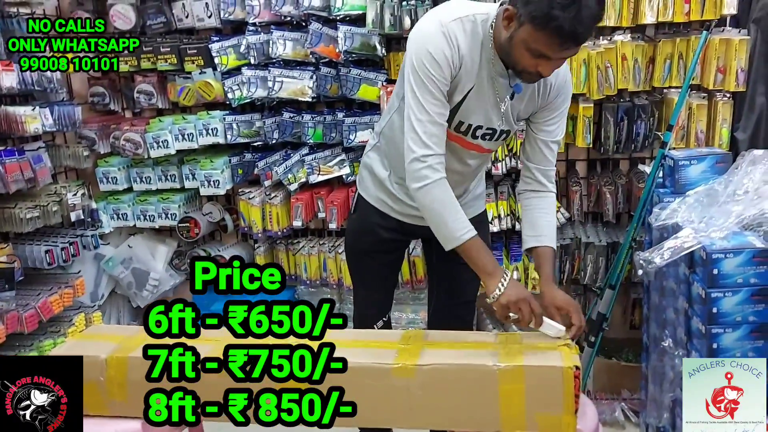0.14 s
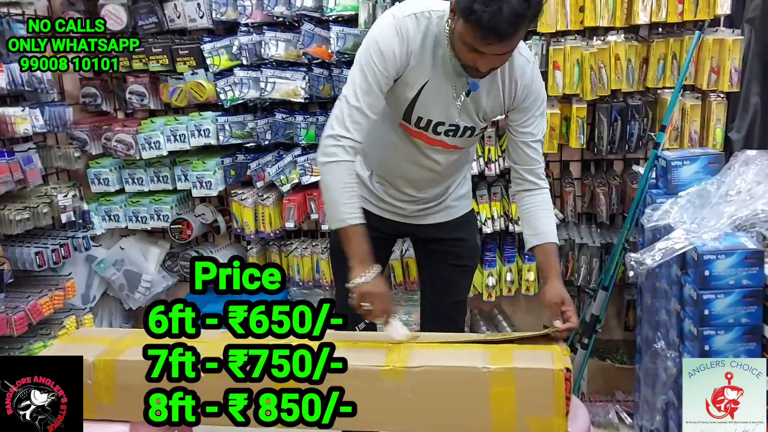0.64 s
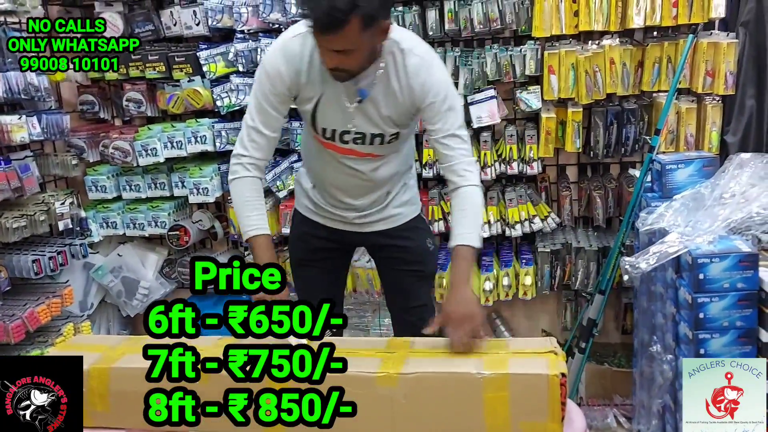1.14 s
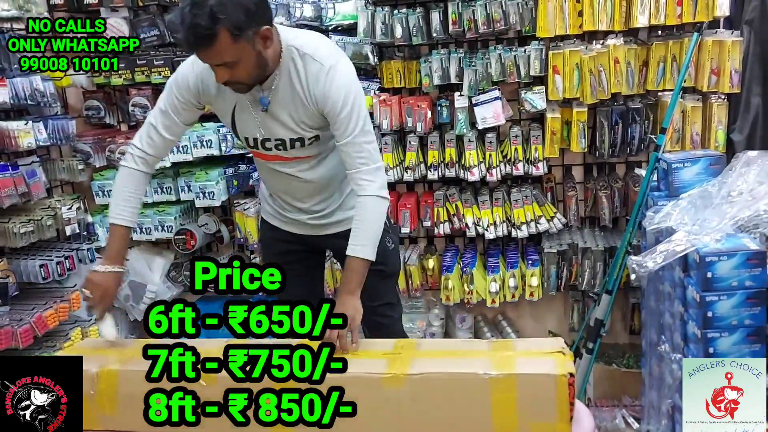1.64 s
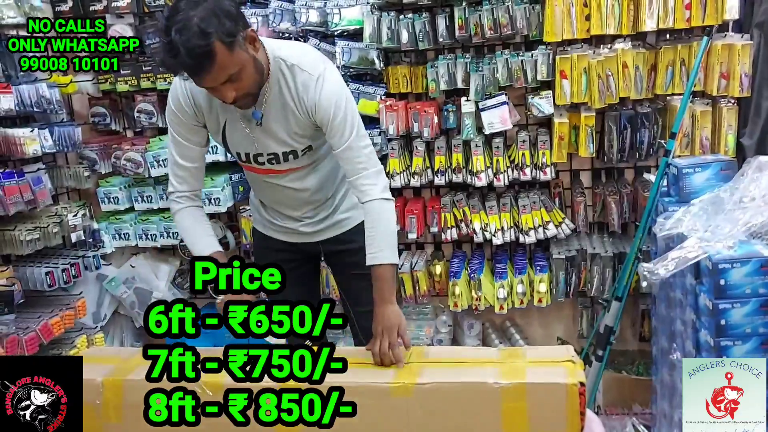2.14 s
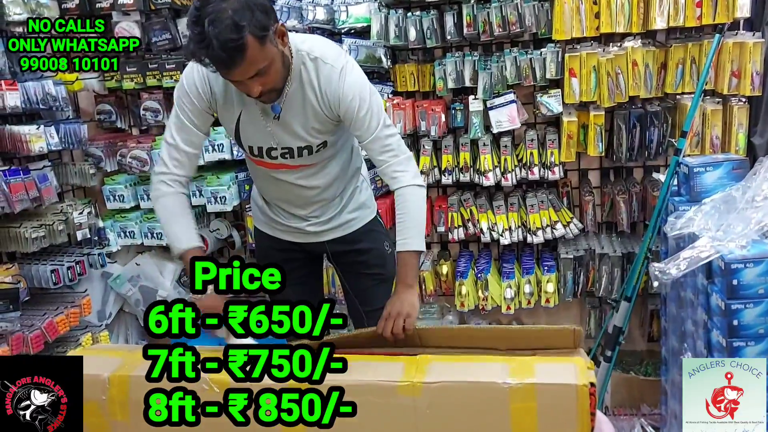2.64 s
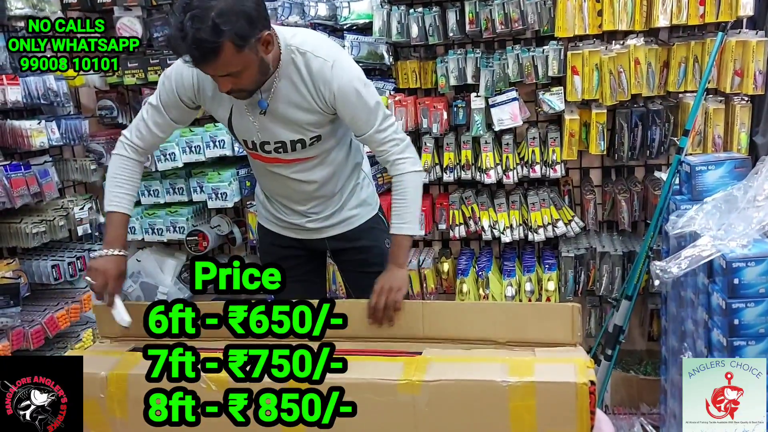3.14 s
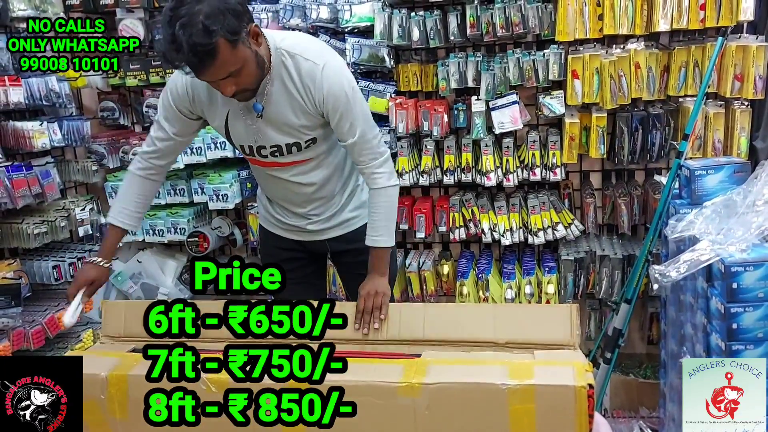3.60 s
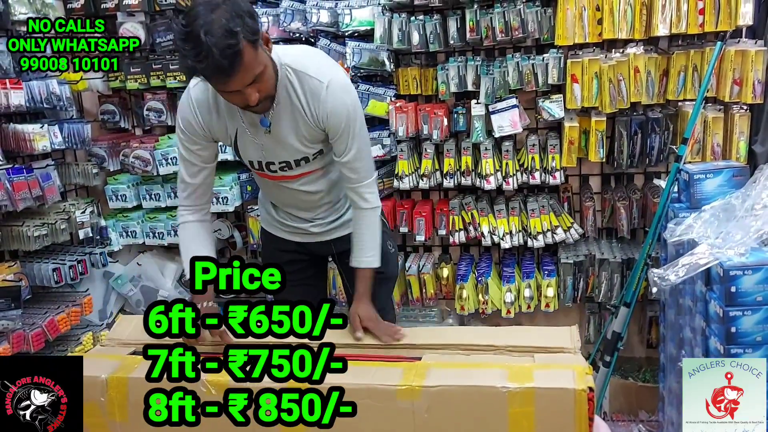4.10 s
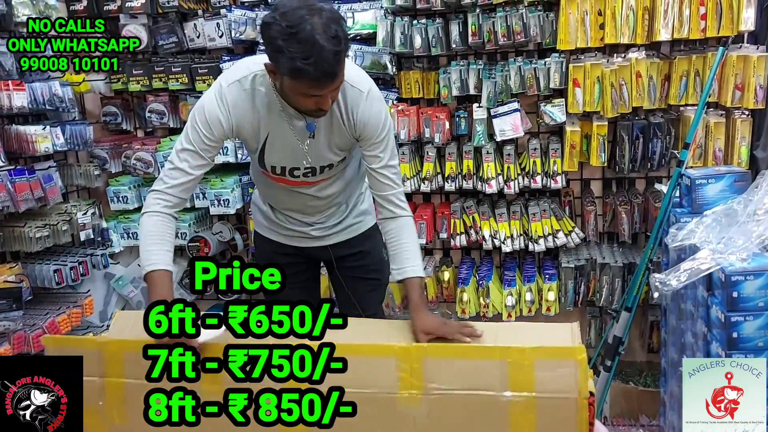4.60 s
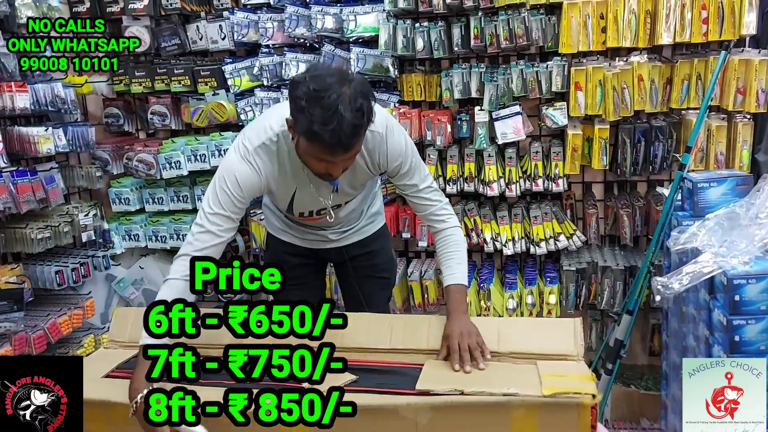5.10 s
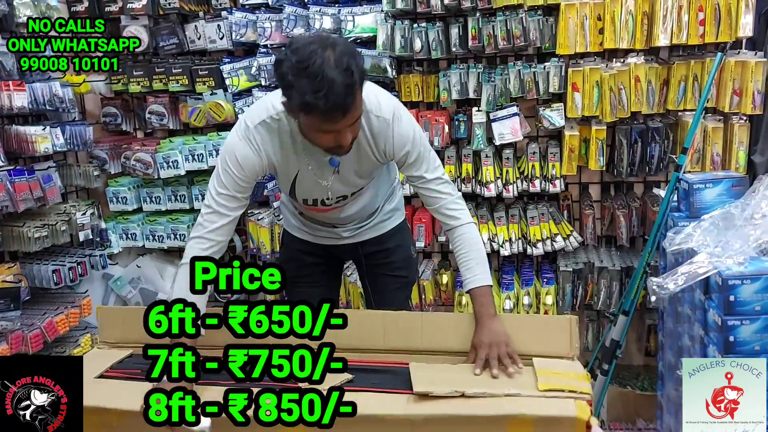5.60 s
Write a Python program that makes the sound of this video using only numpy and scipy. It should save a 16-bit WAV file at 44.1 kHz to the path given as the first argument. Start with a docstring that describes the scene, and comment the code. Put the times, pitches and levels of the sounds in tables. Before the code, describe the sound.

Crackling tape tears on a long hollow carton, with a rising ribbed buzz, two loud pops, sliding hands and tiny metallic clinks.

```python
"""A small shop, heard by a stereo microphone: street rumble through the door, soft air noise, a faint held tone.
Hands lie on a long cardboard box; from 0.3 s a cutter scrapes and tears its taped seam in dense clicks.
The hollow box, a set of ringing modes, booms with slips and blows, and the metal links of a bracelet clink.
Near 1.5 s the blade buzzes across the ribs of the board, faster and faster; near 2.8 and 3 s flaps pop free.
Then mostly hands slide over the flaps, with more knocks, a last clink and a last pull at the seam."""
import sys
import numpy as np
from scipy import signal
from scipy.fft import rfft, irfft, next_fast_len
from scipy.io import wavfile
from scipy.ndimage import uniform_filter1d

SR = 44100
rng = np.random.default_rng(int(sys.argv[2]) if len(sys.argv) > 2 else 0)


def ratio(d):
    """dB to gain"""
    e = np.asarray(d, float) / 20
    return 10 ** e


def master_out(mix):
    """Clip the mix to full scale and print it as 16-bit PCM to the path in sys.argv[1]."""
    frames = np.transpose(np.atleast_2d(mix))
    ceiling = np.clip(frames, -1, 1)
    pcm = np.round(ceiling * 32767).astype(np.int16)
    wavfile.write(sys.argv[1], SR, pcm)


N = 253134


def evened(x):
    """Scales to rms 1."""
    return x / np.sqrt(np.mean(x ** 2) + 1e-20)


def read(points, hz):
    """Reads a table on a log-frequency axis."""
    f, value = np.transpose(points)
    return np.interp(np.log(hz + 1), np.log(f + 1), value)


def played(rows):
    """Columns of a control table at every sample."""
    s, *columns = np.transpose(rows)
    return [np.interp(np.arange(N) / SR, s, column) for column in columns]


def add(mix, s, sound):
    """Mixes a sound in at time s."""
    part = mix[round(s * SR):][:len(sound)]
    part += sound[:len(part)]


def coloured(x, spectrum):
    """Gives x a spectrum, rms 1."""
    size = next_fast_len(N)
    gain = ratio(read(spectrum, np.fft.rfftfreq(size, 1 / SR)))
    return evened(irfft(rfft(x, size) * gain, size)[..., :N])


def smooth_noise(count, size):
    """Slow random wander of rms 1: white noise averaged over size samples."""
    return evened(uniform_filter1d(rng.standard_normal(count), size, axis=0))


def grains(per_s, spread_db, clump_db, clump_s):
    """Random clicks, a few large, that come in clumps; rms 1."""
    size = ratio(spread_db * np.minimum(rng.exponential(1, N), 5)) * rng.choice([-1., 1.], N)
    clumps = smooth_noise(N, max(round(clump_s * SR), 2))
    struck = rng.random(N) < per_s / SR
    return evened(size * struck * ratio(clump_db * clumps))


def ring(modes, gains_db, phases, rise_s):
    """One blow on a set of dying modes, peak 1."""
    t = np.arange(SR // 2) / SR
    hz, db, t60 = np.transpose(modes)[:, :, None]
    decay = ratio(db + gains_db[:, None] - 60 * t / t60)
    waves = decay * np.sin(2 * np.pi * hz * t + phases[:, None])
    sound = waves.sum(0) * (1 - np.exp(-t / rise_s))
    return sound / abs(sound).max()


def patchy(x, patchy_db):
    """Each stretch of board and tape has its own colour: random patches over time and pitch."""
    hz, t, z = signal.stft(x, SR, nperseg=512, noverlap=384)
    patches = rng.standard_normal((len(t), len(hz)))
    patches = uniform_filter1d(patches, size=14, axis=0)
    patches = evened(uniform_filter1d(patches, size=5, axis=1))
    return evened(signal.istft(z * ratio(patchy_db * patches.T), SR, nperseg=512, noverlap=384)[1][:N])


def strokes(rows):
    """Summed power of strokes that swell and fade, at the surface and in the walls."""
    t, power = np.arange(N) / SR, np.zeros((2, N))
    for s, rise_s, fall_s, surface_db, walls_db in rows:
        away = np.where(t < s, (s - t) / rise_s, (t - s) / fall_s)
        shape = ratio(2 * -20 * away ** 1.2)  # 20 dB down one rise before and one fall after the peak
        power += shape * ratio(2 * np.array([[surface_db], [walls_db]]))
    return power


# how alike the shop's tail is at the two microphone sides: pitch_hz, likeness (0 to 1)
LIKENESS = [(60, 1), (290, 0.86), (640, 0.48), (1400, 0.061), (3000, 0.2), (7000, 0.0045)]
# how long the shop rings: pitch_hz, t60_s
SHOP_DECAY = [(100, 0.17), (500, 0.15), (2000, 0.13), (12000, 0.047)]


def shop(x, wet_db, size):
    """Direct sound plus a tail of fresh noise with each band's dying power; wet_db is tail over direct."""
    hz, t, z = signal.stft(x, SR, nperseg=size, noverlap=3 * size // 4)
    keep = ratio(-120 * (size // 4) / SR / read(SHOP_DECAY, hz))  # power left after one hop
    power, held = abs(z.T) ** 2, np.zeros(z.T.shape)
    for k in range(1, len(t)):
        held[k] = keep * held[k - 1] + (1 - keep) * power[k - 1]
    real, imag = rng.standard_normal((len(t), len(hz), 2, 3)).transpose(2, 3, 1, 0)
    chance = real + 1j * imag  # one shared noise, then one for each side
    same = np.clip(read(LIKENESS, hz), 0, 1)[:, None]
    tail = np.sqrt(held.T) * (np.sqrt(same) * chance[0] + np.sqrt(1 - same) * chance[1:])
    wet = signal.istft(tail, SR, nperseg=size, noverlap=3 * size // 4)[1][:, :N]
    return (x + ratio(wet_db) * wet) / np.sqrt(1 + ratio(2 * wet_db))


# street rumble at the microphone, before its bass cut: start_s, level_db
RUMBLE_LEVEL = [(0, -45.5), (.75, -47), (.84, -40), (.99, -51), (1.21, -54), (1.45, -68), (2.1, -49.5),
                (2.21, -56), (2.28, -49), (2.72, -53.5), (3.31, -43), (3.5, -48.5), (3.67, -45.5),
                (3.88, -52), (4.25, -45), (4.8, -50.5), (5.2, -47), (5.56, -43), (5.74, -53)]
# drifting colour of the rumble: start_s, centre_hz, width_hz
RUMBLE_COLOUR = [(0, 85.4, 50), (1, 90, 60.4), (2, 85, 60), (2.7, 70, 50), (3.1, 61.4, 25.7),
                 (3.998, 65.3, 30), (5, 68, 39.8), (5.74, 70.4, 50)]


def street():
    """Street rumble through the door: noise under a low, drifting hump, nearly alike on both sides."""
    hz, t, z = signal.stft(rng.standard_normal((2, N)), SR, nperseg=4096, noverlap=3072)
    s, centre_hz, width_hz = np.transpose(RUMBLE_COLOUR)
    detune = 2 * (hz[:, None] - np.interp(t, s, centre_hz)) / np.interp(t, s, width_hz)
    hump = 1 / (1 + np.where(detune > 0, abs(detune) ** 1.42, detune ** 4))  # steep below, gentle above
    hump /= np.linalg.norm(hump, axis=0)
    mid, side = evened(signal.istft(z * hump, SR, nperseg=4096, noverlap=3072)[1][:, :N])
    return ratio(played(RUMBLE_LEVEL)[0]) * (mid + ratio(-15.5) * np.outer([1, -1], side))


# colour of the air noise: pitch_hz, relative level_db (per Hz)
AIR_COLOUR = [(18, -40), (30, 13), (86, -8), (203, -0.5), (326, -4), (1030, -11.5), (2150, -8), (3540, -17),
              (11500, -41), (14600, -36), (15800, -33)]


def air():
    """Steady coloured noise that fills the shop, almost all of it tail."""
    level_db = -54
    return ratio(level_db) * shop(coloured(rng.standard_normal(N), AIR_COLOUR), wet_db=13, size=1024)


# brief held tones, the louder ones creaks of a bending flap: start_s, end_s, pitch_hz, level_db (dry rms)
HELD_TONES = [(0, .5, 492, -64.5), (1.133, 1.173, 1274, -47), (2.854, 2.917, 404, -44),
              (2.908, 2.97, 359, -30.5), (2.921, 2.955, 575, -32), (4.929, 5.112, 885, -58.5),
              (5.088, 5.31, 265, -49.5)]


def tones():
    """Slightly wavering sines that fade in and out."""
    out = np.zeros(N)
    for start, end, hz, db in HELD_TONES:
        count = round((end - start) * SR)
        waver = 1 + 0.013 * smooth_noise(count, 900)
        wave = np.sin(2 * np.pi * np.cumsum(hz * waver) / SR)
        add(out, start, np.sqrt(2) * ratio(db) * wave * signal.windows.tukey(count, .4))
    return out


# colours of tearing and of rubbing: pitch_hz, relative level_db (per Hz)
TEAR_COLOUR = [(290, -30.5), (500, -7), (585, -25), (814, -18), (926, -30), (1180, -12), (1380, -14.5),
               (1900, -12.5), (4750, -14), (7200, -11), (9060, -15), (11700, -15.5), (15400, -21.5)]
RUB_COLOUR = [(290, -34), (500, -11), (537, -32), (814, -11), (887, -4.5), (1380, -14), (1840, -12),
              (2420, -9), (3830, -2.5), (4750, -4.5), (9320, -4), (11600, 2), (15400, -5.5)]
# sudden rips of tape and fibre: start_s, level_db (nominal dry peak), crack_db (first crack over the rip),
# dull_db (dull half over the bright)
RIPS = [(0.3005, -45, -2.5, -2), (0.3733, -18, -3.5, -4.5), (0.4706, -24.5, 5.5, 1.5),
        (0.561, -22.5, 9.5, -2), (0.594, -25, 5, -18), (0.6195, -17, 9.5, 3), (0.759, -19.5, 11, 0),
        (0.828, -20, 3, 0), (0.8364, -14, 4, -0.5), (0.8642, -11, 6, -11.5), (1.1393, -23, -5, 3.5),
        (1.2153, -32, -1, 0.5), (1.3764, -27, 8, -1), (2.234, -42, -12, 8.5), (2.5064, -19.5, 1, -8),
        (2.587, -25.5, 6, -8), (2.6239, -11.5, 4, -3), (2.793, -14.5, -1, 2), (2.802, -5.5, 4.5, -2.5),
        (2.97, -4, 5, 4), (3.565, -31, -4, -1), (3.6404, -33, -7, 4), (3.8155, -31, -7, -1),
        (4.804, -29, 14, -10), (4.848, -18, 5.5, -8), (4.863, -25, 5, 2), (4.963, -23, 9, -2),
        (5.1524, -22, -11, -9), (5.3403, -41, 1, 2), (5.5903, -24.5, 13.5, 0)]
# strokes of the cutter and pulls that tear the seam:
# peak_s, rise_s, fall_s, surface_db, walls_db (slips in the walls)
CUTTER_STROKES = [(0.45, 0.3, 0.2, -45.5, -47), (0.57, 0.04, 0.28, -34.5, -45), (0.78, .02, 0.13, -43, -36),
                  (0.85, .12, 0.035, -26, -26), (0.92, .1, 0.35, -42, -47), (1.3, 0.28, 0.72, -55, -35),
                  (1.55, 0.18, 0.31, -29.5, -31.5), (1.73, 0.58, .11, -26.5, -34.5),
                  (2.09, 0.18, 0.14, -48, -52), (2.49, .7, .07, -53, -64), (2.64, 0.04, 0.073, -30, -31.5),
                  (2.79, 0.11, 0.27, -32.5, -25.5), (2.95, 0.44, 0.078, -30, -31.5),
                  (4.4, .3, 0.4, -43, -44), (5.39, .18, 0.45, -30.5, -39.5), (5.72, .3, .3, -61, -48)]
# hands sliding over the flaps: peak_s, rise_s, fall_s, surface_db, walls_db
HAND_SLIDES = [(0.3, 0.033, .12, -47, -60), (0.621, 0.079, .14, -26.5, -33), (1.18, 0.062, 0.2, -46, -60),
               (3.0, 0.066, 0.12, -34, -41), (3.321, 0.2, 0.15, -41.5, -56.5),
               (3.4, .2, 0.072, -48.5, -55.5), (3.6, 0.046, .5, -57, -62.5), (3.9, 0.11, 0.66, -41.5, -57),
               (4.3, 0.36, 0.053, -39.5, -49), (4.55, 0.19, .6, -36, -48), (4.87, 0.75, 0.089, -33.5, -66),
               (5.1, 1, 0.72, -37.5, -50.5), (5.6, 0.47, 0.1, -35, -33.5)]
# slow, slight left-right wander of the surface sounds: start_s, left_over_right_db
SURFACE_BALANCE = [(0, -1), (1, 1.5), (2.3, -0.5), (3, 0), (4.3, 0), (4.9, -0.5), (5.74, 1)]


def surface():
    """Fibres and glue let go as dense clicks; a rip starts with a crack and peters out."""
    rest_db, crest_db, crackle_db = -56.5, 11, -11.5  # hands at rest; rip peak over rms; crackle over stroke
    rip_t60_s, crack_t60_s = 0.2, 0.011
    cuts = strokes(CUTTER_STROKES)[0] + ratio(2 * rest_db)
    slides = strokes(HAND_SLIDES)[0]
    tear_shares = np.array([0.77, 0.21])  # tearing against rubbing, in cuts and in slides
    tearing, rubbing = np.sqrt(np.array([tear_shares, 1 - tear_shares]) @ [cuts, slides])

    t = np.arange(SR // 3) / SR
    bright, dull, cracks = np.zeros((3, N))
    for s, db, crack_db, dull_db in RIPS:
        rip = ratio(db - crest_db - 60 * t / rip_t60_s)
        add(cracks, s, ratio(db - crest_db + crack_db - 60 * t / crack_t60_s))
        add(bright, s, rip)
        add(dull, s, rip * ratio(dull_db))

    shared = rng.standard_normal(N)
    # single fibres that snap during a stroke
    crackle = coloured(grains(per_s=110, spread_db=3.5, clump_db=3.5, clump_s=0.026), RUB_COLOUR)
    crackle = ratio(crackle_db) * np.sqrt(cuts + slides) * crackle
    out = []
    for side in range(2):  # the seam is long, so each microphone side hears its own stretch of it best
        tear = grains(per_s=6000, spread_db=3, clump_db=2.5, clump_s=.006) + 0.34 * shared
        rub = grains(per_s=12000, spread_db=1.5, clump_db=4.5, clump_s=.012) + 0.19 * shared
        tear = patchy(coloured(tear, TEAR_COLOUR), patchy_db=2.5)
        rub = patchy(coloured(rub, RUB_COLOUR), patchy_db=1.5)
        steady = tearing * tear + rubbing * rub + crackle
        fibres = grains(per_s=9000, spread_db=4, clump_db=1.9, clump_s=0.0071)
        fibres = patchy(coloured(fibres, TEAR_COLOUR), patchy_db=4.0)
        low = signal.filtfilt(*signal.butter(2, 4500, fs=SR), fibres)
        snapped = dull * low + bright * (fibres - low) + cracks * coloured(shared, TEAR_COLOUR)
        out.append(shop(steady + snapped, wet_db=3.5, size=256)[side])
    return out * ratio(np.outer([.5, -.5], played(SURFACE_BALANCE)[0]))


def strain():
    """How hard the walls slip: under cuts and slides, and for a moment after every blow."""
    rest_db, settle_db, settle_t60_s = -65, -19.5, 0.22  # settle_db: under the peak of the blow
    t = np.arange(SR // 3) / SR
    power = strokes(CUTTER_STROKES + HAND_SLIDES)[1] + ratio(2 * rest_db)
    for s, db, low_hz, tilt_db in BLOWS:
        add(power, s, ratio(2 * (db + settle_db - 60 * t / settle_t60_s)))
    return np.sqrt(power)


# walls and air of the box: pitch_hz, relative level_db, t60_s
BOX_MODES = [(110, -23, 0.077), (167.5, -2.5, 0.12), (253.7, -1.5, 0.063), (301.7, 3, 0.082),
             (355, 4, 0.083), (410, 1, .1), (475.6, -4.5, 0.063), (571, -1.5, 0.11), (662.3, -3.5, 0.081),
             (738, -6, 0.028), (813, -12.5, 0.04), (907, -14, 0.12), (1087, -12.5, 0.07), (1387, -11, 0.06),
             (1528, -12.5, 0.02), (1684, -12, 0.044), (2040, -14.5, 0.025), (2523, -18, 0.032)]
# blows and pops that ring the box: start_s, level_db (dry peak), low_hz (lowest pitch well struck),
# hardness (dB per octave above low_hz)
BLOWS = [(0.618, -16.5, 346, -4.5), (0.791, -23, 151, 6), (0.822, -19.5, 366, 5.5), (0.864, -27, 358, -21),
         (1.158, -28, 170, -13), (1.288, -24.5, 270, -13), (2.047, -25.5, 340, -10.5),
         (2.077, -25.5, 333, -24), (2.104, -33, 398, -17), (2.234, -20, 330, -28), (2.462, -30.5, 165, -8),
         (2.63, -34, 409, -5), (2.654, -18, 350, -10), (2.711, -32, 401, 2), (2.802, -7, 327, -14),
         (2.808, -4.5, 385, 2.5), (2.825, -38, 285, -3), (2.844, -26, 258, -5), (2.968, -4.5, 383, 2),
         (2.984, -13.5, 412, 2), (4.388, -38, 310, 8), (4.577, -22.5, 418, -6), (4.604, -26.5, 390, 4),
         (4.645, -22.5, 460, 1.5), (4.765, -31.5, 257, -25), (5.043, -33.5, 172, -13.5),
         (5.175, -24.5, 448, 8), (5.339, -20, 470, -0.5), (5.532, -16.5, 180, 4.5), (5.552, -19, 170, -3),
         (5.567, -26, 323, -6)]
# the stand shakes: start_s, level_db (dry peak)
STAND_THUDS = [(2.802, -22), (2.969, -24), (5.535, -34)]


def box():
    """Uneven slips and single blows ring the hollow box; each blow finds the modes at other strengths."""
    slips = grains(per_s=1400, spread_db=1.5, clump_db=3.0, clump_s=.02) * strain()
    hz = np.transpose(BOX_MODES)[0]
    body = ring(BOX_MODES, -.3 * np.log2(hz / 360), np.zeros(len(hz)), rise_s=0.00072)
    out = signal.oaconvolve(slips, body / np.linalg.norm(body))[:N]
    chance = rng.uniform(-0.96, 1, (len(BLOWS), 2, len(hz)))
    for (s, db, low_hz, tilt_db), (phases, place) in zip(BLOWS, chance):
        octaves = np.log2(hz / low_hz)
        gains_db = np.where(octaves > 0, tilt_db, 11) * octaves + 2.1 * place
        add(out, s, ratio(db) * ring(BOX_MODES, gains_db, 1.3 * phases, rise_s=0.0011))
    stand_hz, stand_t60_s = 57.6, 0.43
    thud = ring([(stand_hz, 0, stand_t60_s)], np.zeros(1), np.zeros(1), rise_s=0.012)
    for s, db in STAND_THUDS:
        add(out, s, ratio(db) * thud)
    return out


# modes of the metal links: pitch_hz, relative level_db, t60_s
LINK_MODES = [(6130, 5, 0.16), (8100, 7, 0.15), (5470, -19, .1), (9200, -25, 0.12)]
# touches of the bracelet: start_s, level_db (dry peak), pitch_factor (set by the size of the links)
LINK_TOUCHES = [(0.3745, -29.5, 1), (0.4706, -35, 0.7), (3.5673, -39.5, 1.04), (3.5773, -39, 0.99),
                (3.6044, -45, 0.97), (3.6403, -45, 0.83), (3.8157, -41, 0.68), (5.4301, -25.5, 0.96)]


def bracelet():
    """Small metal links touch and ring."""
    out = np.zeros(N)
    for s, db, factor in LINK_TOUCHES:
        phases = rng.uniform(0, 2 * np.pi, len(LINK_MODES))
        modes = LINK_MODES * np.array([factor, 1, 1])
        add(out, s, ratio(db) * ring(modes, np.zeros(len(modes)), phases, rise_s=0.00046))
    return out


# the blade crosses the ribs of the board faster and faster: start_s, ribs_per_s, level_db (plain sway, dry)
RIB_CROSSINGS = [(1.461, 149, -35), (1.48, 158, -27), (1.516, 166, -27), (1.535, 197, -29.5),
                 (1.569, 226, -24.5), (1.62, 239, -29.5), (1.679, 262, -28), (1.74, 290, -34.5),
                 (1.79, 295, -39)]
# overtones 2 to 4 of the sway: level_db (against the plain sway, before their flutter)
SWAY_OVERTONES = [-8, -14, -14]


def ribs():
    """Each rib sways the board and knocks the box once: a rising, uneven buzz that lights up the modes it meets."""
    knocks_db = -11  # knocks on the box, against the plain sway
    per_s, level_db = played(RIB_CROSSINGS)
    turns = np.cumsum(per_s * (1 + 0.036 * smooth_noise(N, 250))) / SR
    knocks = np.diff(np.floor(turns), prepend=0) * ratio(5.2 * rng.standard_normal(N))
    hz = np.transpose(BOX_MODES)[0]
    body = ring(BOX_MODES, 5 * np.log2(hz / 360), np.zeros(len(hz)), rise_s=0.0016)
    boom = evened(signal.oaconvolve(knocks, body)[:N])
    flutter = ratio(2.7 * smooth_noise((N, len(SWAY_OVERTONES)), 900)).T
    sway = np.cos(2 * np.pi * turns)
    for k, db in enumerate(SWAY_OVERTONES):
        sway = sway + ratio(db) * flutter[k] * np.cos(2 * np.pi * (k + 2) * turns)
    buzz = np.sqrt(2) * sway + ratio(knocks_db) * boom
    t = np.arange(N) / SR
    inside_s = np.minimum(t - RIB_CROSSINGS[0][0], RIB_CROSSINGS[-1][0] - t)
    return ratio(level_db) * buzz * np.clip(inside_s / 0.016 + .5, 0, 1)  # 16 ms fades


# the whole level dips briefly: centre_s, half_width_s, level_db
LEVEL_DIPS = [(2.2, 0.039, -5), (2.575, 0.014, -5), (3.51, 0.058, -5.5)]


def scene():
    """All sources in the shop under brief level dips; all but the street get the shop's tail."""
    mix = street() + air() + surface()
    mix = mix + shop(box(), wet_db=1.5, size=512)
    mix = mix + shop(bracelet(), wet_db=2.0, size=256)
    mix = mix + shop(tones() + ribs(), wet_db=-3.5, size=1024)
    t = np.arange(N) / SR
    return mix * ratio(sum(db * np.exp(-((t - s) / half_s) ** 4) for s, half_s, db in LEVEL_DIPS))


def band_limit(x):
    """A steep low-pass at the top of the band."""
    return signal.sosfilt(signal.butter(12, 16640, fs=SR, output="sos"), x)


# unequal colour of the two microphone sides: pitch_hz, left_over_right_db
SIDE_COLOUR = [(60, -1.0), (240, 1), (950, 1.0), (3770, 0), (15000, -5.5)]


def record(dry):
    """Two microphone sides of unequal colour, a steep bass cut, soft overload and a treble band limit."""
    bass_hz, edge_hz = 50, 15650
    size = next_fast_len(N)
    hz = np.fft.rfftfreq(size, 1 / SR)
    bass_cut = 1 / np.sqrt(1 + (bass_hz / (hz + 1)) ** 24) + ratio(-30)  # some bass leaks through
    sides = ratio(np.outer([.5, -.5], read(SIDE_COLOUR, hz)))
    ports = irfft(rfft(dry, size) * sides * bass_cut, size)
    soft = ports / (1 + ports ** 4) ** .25
    edge = 1 / np.sqrt(1 + (hz / edge_hz) ** 200)
    mix = irfft(rfft(soft) * edge, size)[:, :N]
    return band_limit(mix)


dry = scene()
out = record(dry)
master_out(out)
```